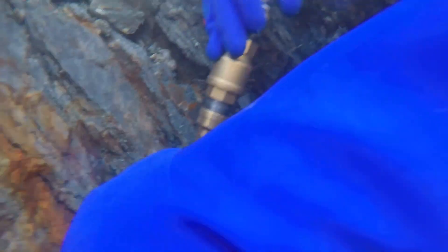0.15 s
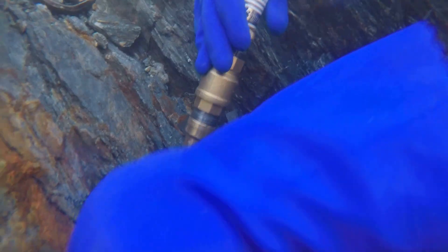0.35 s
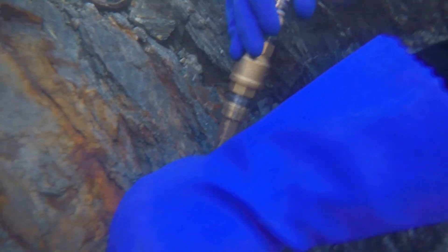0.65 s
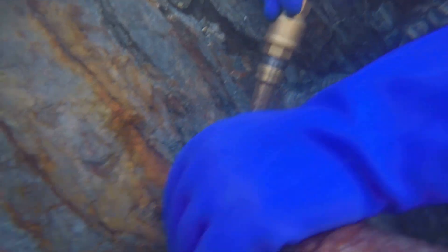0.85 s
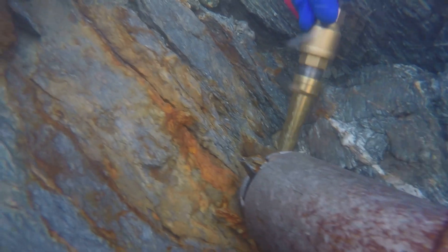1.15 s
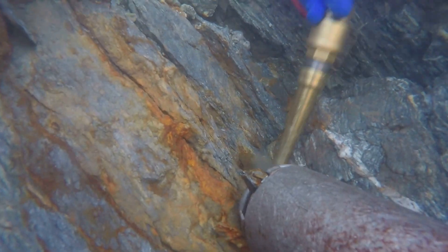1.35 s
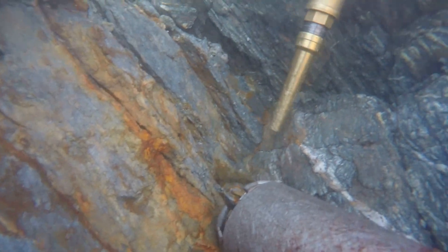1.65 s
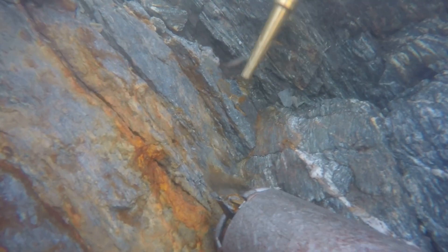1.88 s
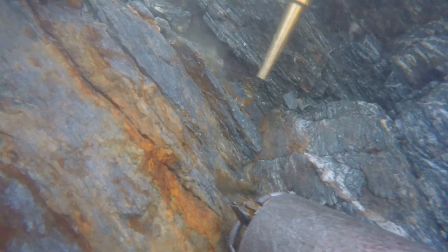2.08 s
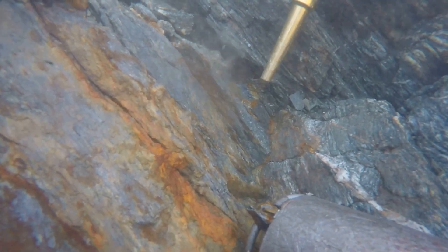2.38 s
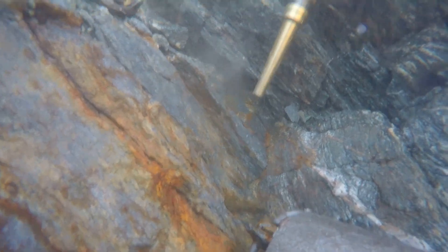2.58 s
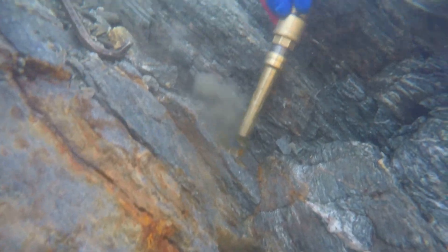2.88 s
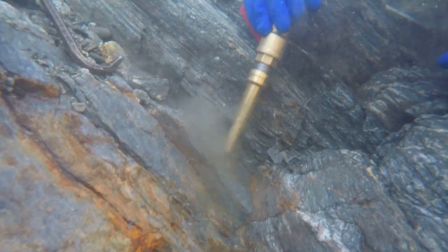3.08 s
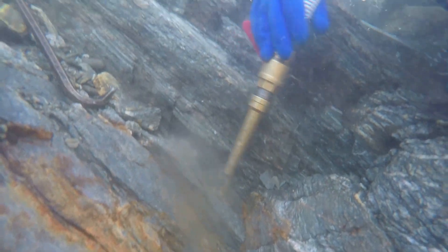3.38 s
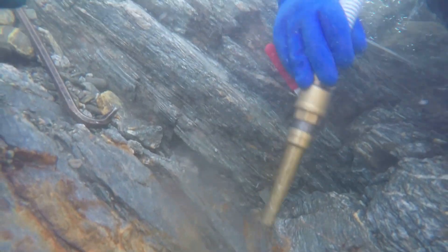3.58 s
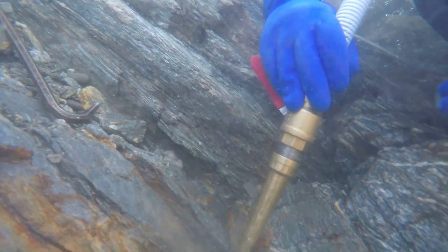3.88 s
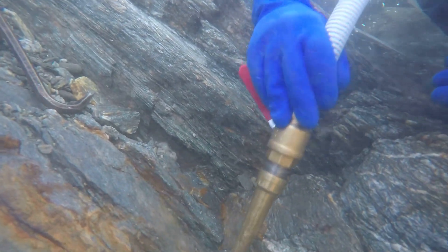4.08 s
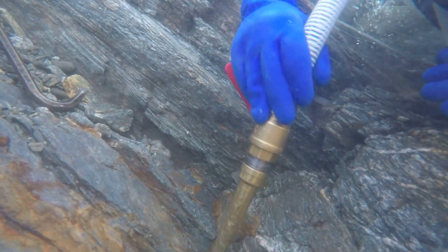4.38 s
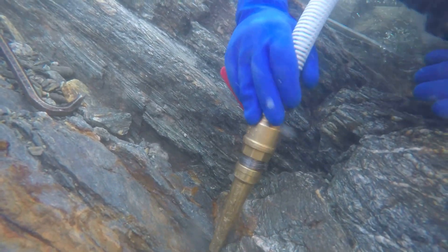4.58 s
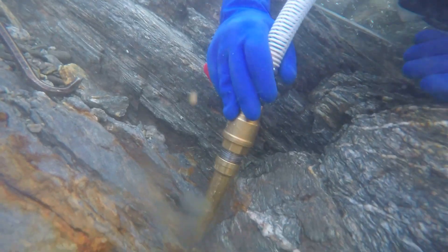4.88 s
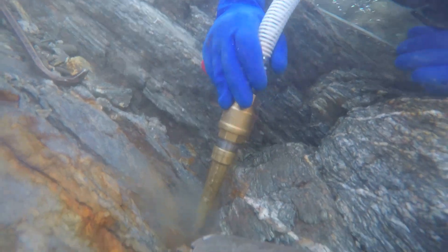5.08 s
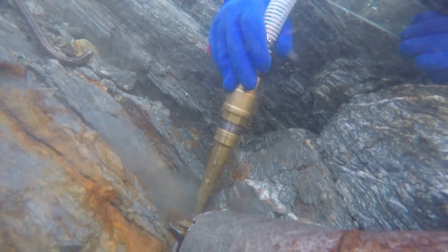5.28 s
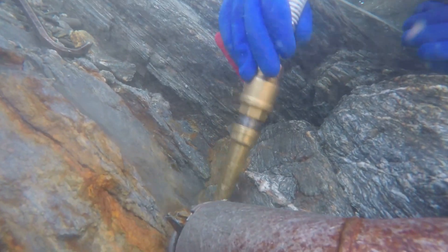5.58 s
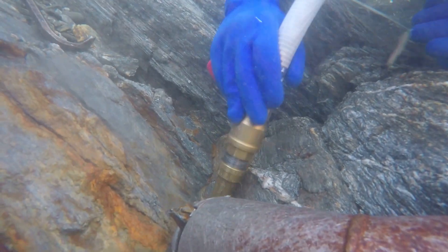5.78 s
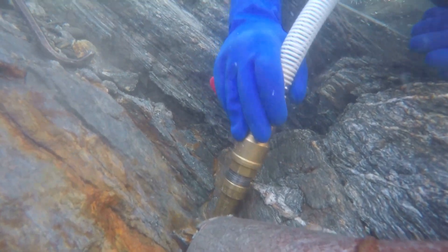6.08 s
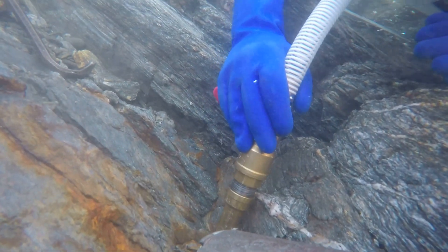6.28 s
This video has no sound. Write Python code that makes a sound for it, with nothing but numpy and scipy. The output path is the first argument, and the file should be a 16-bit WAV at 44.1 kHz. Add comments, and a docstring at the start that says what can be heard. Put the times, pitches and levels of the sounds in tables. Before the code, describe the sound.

Close, muffled underwater sound in a creek. A suction dredge rumbles deep while water hisses through the nozzle and fine grit ticks. It opens with bumps against the microphone housing, a loud stone crack and bubble blips; gravel rattles and scrapes until about two seconds, a sparser, watery middle follows, then bubbles, sharp knocks, and a final burst of stones hitting the pipe.

```python
"""Under water in a creek, 6.45 s: a suction dredge rumbles and water rushes throughout, with ticking grit.
Stones knock and scrape at once, surges thump, bubbles follow; a clatter at 0.6 s thins into scattered clicks.
Bubbles return, mostly from 4 to 5 s; stones strike near 4.4 and 5.6 s and hardest from 6.2 s.
Water and grit are noise through modes of the microphone's sealed housing, and clicks ring those modes;
knocks are thuds with pipe tones, surges damped swings, bubbles sliding sines."""
import sys
import numpy as np
from scipy import signal
from scipy.fft import rfft, irfft, next_fast_len
from scipy.io import wavfile

SR = 44100
rng = np.random.default_rng(int(sys.argv[2]) if len(sys.argv) > 2 else 0)


def unload_audio(sound):
    """Save the sound as a 16-bit wav file, at the path given as the first command line argument."""
    columns = np.transpose(np.atleast_2d(sound))
    # keep every value between -1 and 1, then stretch to whole-number steps
    steps = np.round(np.clip(columns, -1, 1) * 32767)
    wavfile.write(sys.argv[1], SR, steps.astype(np.int16))


N = 284445

# modes of the sealed housing, one list per register (low, middle, high, top): centre_hz, width_hz, gain_db
HOUSING_MODES = [
    [(506, 193, -2), (761, 104, 3), (993, 260, -8.5), (1496, 157, -3)],
    [(1970, 134, -5.5), (2306, 130, 3), (2900, 260, 7.5), (3154, 263, 4), (3466, 360, 0), (4030, 360, -5)],
    [(4520, 210, -5), (4770, 160, -5.5), (5306, 570, -2.5), (6010, 610, -2.5), (7074, 260, -4.5),
     (8060, 840, -10.5)],
    [(9580, 630, -21.5), (10620, 390, -12), (15060, 2400, -12)],
]
LOW, MIDDLE, HIGH, TOP = range(4)


def from_db(db):
    """Decibels to gain."""
    return 10 ** (np.asarray(db) / 20)


def rms_one(x):
    """Scale to rms 1."""
    return x / np.sqrt(np.mean(x ** 2) + 1e-20)


def in_time(rows):
    """Interpolate the columns of a curve table, sample by sample."""
    s, *columns = np.transpose(rows)
    return [np.interp(np.arange(N) / SR, s, c) for c in columns]


def drift(rate_hz):
    """Slow chance of rms 1: noise at SR / 40 through a double one-pole low-pass, run in."""
    r = np.exp(-80 * np.pi * rate_hz / SR)
    noise = rng.standard_normal(N // 40 + 2002)
    slow = signal.lfilter([1], [1, -2 * r, r * r], noise)[2000:]
    return np.interp(np.arange(N) / 40, np.arange(len(slow)), rms_one(slow))


def resonance(x, hz, width_hz):
    """Two-pole resonance with gain 1 on top."""
    r = np.exp(-np.pi * width_hz / SR)
    zeros = np.array([1, 0, -1]) * (1 - r * r) / 2
    poles = [1, -2 * r * np.cos(2 * np.pi * hz / SR), r * r]
    return signal.lfilter(zeros, poles, x)


def coloured(spectrum):
    """Noise of rms 1 with the given spectrum, interpolated over log frequency."""
    size = next_fast_len(N)
    hz = np.maximum(np.arange(size // 2 + 1) * SR / size, 1)
    points = np.array(spectrum)
    gain_db = np.interp(np.log(hz), np.log(points[:, 0]), points[:, 1], left=-90, right=-90)
    noise = rfft(rng.standard_normal(size))
    return rms_one(irfft(noise * from_db(gain_db), size)[:N])


def add(out, s, sound):
    """Mix a short sound in at time s."""
    at = round(s * SR)
    out[at:at + len(sound)] += sound[:N - at]


def register(x, index, uneven_db=0):
    """Parallel modes of one housing register, signs alternating; rows of blows may strike them unevenly."""
    modes = HOUSING_MODES[index]
    luck_db = np.zeros((1, len(modes)))
    if uneven_db:
        luck_db = uneven_db * rng.standard_normal((len(x), len(modes), 1))
    return sum((-1) ** k * from_db(db + luck_db[:, k]) * resonance(x, hz, width_hz)
               for k, (hz, width_hz, db) in enumerate(modes))


def grains(per_s, spread_db):
    """Random contacts of uneven size and either sign."""
    sizes = from_db(spread_db * np.minimum(rng.exponential(1, N), 4)) * rng.choice([-1, 1], N)
    return sizes * (rng.random(N) < per_s / SR) + 1e-18   # the offset keeps filters out of denormals


def fine_hiss(level_db):
    """A very faint hiss: noise in the top register, wavering slightly."""
    return from_db(level_db + 1.4 * drift(3.2)) * rms_one(register(rng.standard_normal(N), TOP))


def buffeting(level_db, surge_db):
    """Deepest low sound of the dredge: shaped noise that follows the gusts by half."""
    # spectrum of the buffeting: frequency_hz, relative_level_db
    spectrum = [(10, -21), (16, -11.5), (25, -3), (40, -4.5), (60, -9.5), (80, -10), (100, -21.5),
                (125, -13.5), (200, -32)]
    return from_db(level_db + 0.49 * surge_db + 0.87 * drift(7.0)) * coloured(spectrum)


def pump_rumble(level_db, surge_db):
    """Pump rumble: noise peaking near 170 Hz that follows the gusts."""
    # spectrum of the rumble: frequency_hz, relative_level_db
    spectrum = [(80, -38), (112, -15), (140, 0.5), (172, 1), (210, -4), (250, -6.5), (290, -14), (340, -25),
                (440, -28.5), (600, -40)]
    return from_db(level_db + surge_db + 0.42 * drift(12.5)) * coloured(spectrum)


def rush(level_db, index):
    """Turbulent water: wavering noise heard through one register of the housing."""
    waver = from_db(0.91 * drift(4.6) + 1.6 * drift(45.0))
    return from_db(level_db) * rms_one(register(waver * rng.standard_normal(N), index))


def jet(level_db):
    """The jet hisses in the middle register, sings in a narrow band and crackles with lifted sand."""
    hiss = rush(0, MIDDLE)
    singing = from_db(-2.5 + 2.9 * drift(3.9)) * resonance(hiss, 3100, 140)
    sand = grains(400 * from_db(1.8 * drift(9.9)), spread_db=14.0)
    crackle = rms_one(register(sand, MIDDLE))
    return from_db(level_db) * rms_one(hiss + singing + from_db(-14) * crackle)


def froth():
    """Rows of small bubbles at random times and pitches within each swarm."""
    # swarms of small bubbles: start_s, end_s, mean_peak_db
    swarms = [(0.093, 0.447, -48.5), (0.948, 1.707, -54.5), (4.298, 4.364, -43.5), (4.711, 4.839, -44),
              (4.841, 4.988, -42), (5.066, 5.117, -52.5)]
    per_s, low_hz, octaves, cycles = 150, 552, 1.99, 29
    rows = []
    for start, end, peak_db in swarms:
        count = round(per_s * (end - start))
        for when, size, luck, slide in rng.random((count, 4)):
            s = start + when * (end - start)
            hz = low_hz * 2 ** (octaves * size)
            rise_per_s = 3.3 * (2.6 * slide - 0.6)
            rows.append((s, peak_db + 12 * (luck - 0.5), hz, cycles / hz, rise_per_s))
    return rows


def bubbles():
    """A bubble rings on, then dies quickly: an unsteady sine whose pitch slides."""
    # bubbles pinched off near the nozzle: start_s, peak_db, start_hz, t60_s, rise_per_s (share of pitch)
    nozzle_bubbles = [(.245, -32.5, 1530, 0.022, 4), (.273, -23, 732, 0.065, 4.5),
                      (.25, -40, 796, 0.022, 4), (.25, -42, 1060, 0.022, 3), (.333, -41, 1234, .04, 15.5),
                      (.355, -38, 920, 0.045, 11), (.367, -45, 1520, .03, 0), (.379, -38, 870, 0.054, -4),
                      (.403, -45, 1510, 0.043, 2), (.44, -39, 745, 0.049, 6), (2.323, -21, 701, 0.068, 5),
                      (2.324, -27.5, 595, 0.043, -1), (3.915, -30.5, 2900, 0.015, -3),
                      (4.018, -44, 1080, 0.048, 9), (4.043, -33, 782, 0.054, 2),
                      (4.059, -41, 2900, 0.023, -4), (4.325, -33, 1300, 0.03, 1),
                      (4.733, -40, 1830, .025, 0), (4.743, -43, 2330, .03, -1),
                      (4.772, -27, 1125, 0.057, 3), (4.809, -34, 1080, 0.04, 1), (4.85, -35, 1104, .03, 2),
                      (4.852, -38, 630, 0.049, -2), (4.873, -32, 2310, 0.019, -5.),
                      (4.878, -31, 835, .03, 1), (4.925, -43, 4000, .02, -1), (4.94, -32, 1017, 0.046, 4),
                      (4.944, -29.5, 765, 0.089, 3), (5, -28, 3850, 0.0078, 2.5),
                      (5.037, -42, 1630, .025, 2)]
    out, t = np.zeros(N), np.arange(8192) / SR
    wobble = from_db(0.77 * drift(77.0))
    for s, peak_db, hz, t60_s, rise_per_s in [*nozzle_bubbles, *froth()]:
        shape = (1 - np.exp(-t / 0.0016)) * from_db(-60 * (t / t60_s) ** 1.56)
        tone = np.sin(2 * np.pi * hz * (t + rise_per_s * t * t / 2))
        add(out, s, from_db(peak_db) * shape / shape.max() * tone)
    return wobble * out


def thumps():
    """A surge pushes the housing, which swings back and settles: a damped sine."""
    # surges against the housing: start_s, peak_db, swing_hz, t60_s, direction (+1 or -1)
    surges = [(0.099, -9, 21, 0.22, 1), (0.146, -5, 44, 0.086, 1), (0.164, -2.5, 65, 0.053, 1),
              (0.194, -8.5, 21.2, 0.3, 1), (0.435, -10, 65.5, 0.087, -1), (0.64, -5, 56, 0.083, -1),
              (0.811, -5.5, 55, 0.038, -1), (1.091, -12, 31, 0.048, 1), (2.957, -16, 42, 0.32, 1),
              (4.413, -15, 46.5, 0.15, -1), (5.859, -10.5, 62, 0.035, 1)]
    out, t = np.zeros(N), np.arange(16384) / SR
    for s, peak_db, hz, t60_s, direction in surges:
        swing = (1 - np.exp(-t / 0.00076)) * from_db(-60 * t / t60_s) * np.sin(2 * np.pi * hz * t)
        add(out, s, direction * from_db(peak_db) * swing / np.abs(swing).max())
    return out


def grit(level_db):
    """Sand hisses and ticks in clumps; each grain rings briefly at one of twelve pitches."""
    contacts = grains(800 * from_db(7.3 * drift(25.0)), spread_db=4.5)
    dealt = rng.integers(0, 12, N)
    ticks = np.zeros(N)
    for k, hz in enumerate(np.geomspace(3500, 14000, 12)):
        once = resonance(contacts * (dealt == k) + 1e-18, hz, 0.11 * hz)
        ticks += resonance(once, hz, 0.11 * hz)
    ticks = rms_one(ticks)
    high = ticks + from_db(2.5 + 2.0 * drift(50.0) + 2.5 * drift(13.0)) * rng.standard_normal(N)
    top = ticks + from_db(0.5 + 1.9 * drift(40.0) + 2.3 * drift(11.0)) * rng.standard_normal(N)
    return from_db(level_db) * rms_one(register(high, HIGH) + from_db(2.5) * register(top, TOP))


def housing_body(x):
    """The housing shaking as a whole: two low resonances in series."""
    return resonance(resonance(x, 165, 126), 270, 165)


def scrapes():
    """Dense uneven contacts under each stroke shake the housing and ring three of its registers."""
    # gravel, glove and nozzle along rock: start_s, end_s, body_rms_db, low_rms_db, middle_rms_db, high_rms_db
    strokes = [(0.095, 0.161, -17.5, -43, -47, -51), (0.145, 0.231, -21, -36.5, -41, -49),
               (0.34, 0.474, -37, -63, -63, -73), (0.63, 0.645, -27, -24, -40, -55),
               (0.636, 0.677, -24, -28.5, -29, -47), (0.664, 0.709, -31.5, -33, -33, -68),
               (0.803, 0.834, -18.5, -29, -29, -34), (1.034, 1.7, -52, -63, -52, -68),
               (1.06, 1.142, -54, -52, -50, -63), (1.252, 1.335, -56, -65, -50, -71),
               (1.117, 1.235, -37.5, -41.5, -41, -50.5), (1.345, 1.406, -37, -34.5, -36, -48),
               (1.512, 1.535, -37, -50, -35, -45), (1.592, 1.679, -45, -56, -62, -58),
               (1.763, 1.818, -70, -67, -32.5, -45.5), (1.824, 1.862, -50, -34.5, -27, -40),
               (4.717, 4.844, -57, -54, -44.5, -60), (4.765, 4.809, -60, -52, -51, -42),
               (4.83, 4.95, -44, -42, -52, -72), (4.941, 4.98, -46, -48, -60, -57),
               (5.083, 5.11, -30, -35, -46, -61), (6.17, 6.229, -51, -33, -41, -47),
               (6.286, 6.33, -53, -42, -44, -44)]
    t, out = np.arange(N) / SR, np.zeros(N)
    for k in range(4):
        envelope = np.zeros(N)
        for start, end, *levels_db in strokes:
            fade = np.minimum((t - start) / 0.0026, (end - t) / 0.053)
            envelope += from_db(levels_db[k]) * np.clip(fade, 0, 1)
        contacts = grains(2500 * from_db(5.9 * drift(65.0)), spread_db=-8.5)
        body = housing_body if k == 0 else lambda x: register(x, k - 1)
        out += body(envelope * contacts) / np.std(body(contacts))
    return out


def knocks():
    """A blunt blow of a larger stone: a broad dull thud, and the pipe ringing on in one of its modes."""
    # blows on the pipe: start_s, thud_peak_db, ring_level_db, pipe_mode (index)
    blows = [(0.099, -33, -30, 0), (.13, -34, -36, 0), (.149, -33, -27, 2), (.159, -32, -22, 2),
             (.174, -9.5, -20, 1), (0.1772, -16.5, -25, 2), (.247, -42, -28, 2), (0.256, -26, -40, 2),
             (.265, -24.5, -28, 2), (0.626, -22, -17.5, 1), (0.631, -21, -19, 1), (0.639, -25, -42, 1),
             (0.666, -28, -15.5, 2), (0.674, -43, -49, 3), (.68, -34, -22, 2), (.687, -36, -25.5, 2),
             (.809, -33, -26.5, 2), (0.969, -32, -32, 1), (1.031, -43, -28, 2), (1.34, -19, -48, 3),
             (1.978, -26, -34, 1), (2.133, -21.5, -40, 3), (2.325, -44, -38, 1), (2.766, -22.5, -28, 2),
             (3.334, -33, -34, 0), (4.646, -20.5, -28, 2), (4.847, -16.5, -41, 1), (4.902, -25, -45, 0),
             (5.083, -24, -23.5, 2), (5.1, -24.5, -44, 1), (5.753, -15.5, -26, 2), (5.85, -27, -36, 2),
             (5.855, -23.5, -48, 2), (6.179, -13, -26, 3), (6.18, -28, -21, 4), (6.185, -34, -30, 4),
             (6.268, -29, -30.5, 3), (6.307, -15, -47, 3), (6.315, -21, -32, 3), (6.37, -24, -28, 3),
             (6.373, -43, -27.5, 4)]
    # modes of the pipe: ring_hz, t60_s
    pipe_modes = [(425, 0.047), (530, 0.07), (780, 0.042), (1490, 0.13), (2950, 0.056)]
    # upper edge of the thud for each pipe mode, brighter for higher modes: thud_top_hz
    thud_top_hz = [604, 610, 800, 1310, 1600]
    out, t = np.zeros(N), np.arange(8192) / SR
    for s, thud_db, ring_db, mode in blows:
        hz, t60_s = pipe_modes[mode]
        band = signal.butter(2, [180, thud_top_hz[mode]], "band", fs=SR, output="sos")
        push = rng.standard_normal(len(t)) + 1.05 * (t == 0)   # one push, then a rumble
        thud = signal.sosfilt(band, push * from_db(-60 * t / 0.015))
        tone = np.sin(2 * np.pi * hz * t) + 0.08 * np.sin(2 * np.pi * 1.2 * hz * t)
        ring = tone * from_db(-60 * t / t60_s)
        add(out, s, from_db(thud_db) * thud / np.abs(thud).max() + from_db(ring_db) * ring)
    return out


def pebbles(grit_db):
    """Rows of small clicks at random times, rising and falling with the grit."""
    # small clicks in the five bands, low to top: mean_peak_db
    mean_peak_db = [-50, -41, -42, -40, -50]
    count, spread_db = 36, 5
    at = rng.random(count) * (N - 1)
    peaks_db = mean_peak_db + spread_db * rng.standard_normal((count, 5))
    peaks_db += grit_db[at.astype(int), None] - grit_db.mean()
    return np.column_stack([at / SR, peaks_db])


def clicks(grit_db):
    """Stone contacts: a crack, sharp if strong, rings the housing with its own level in each band."""
    # louder stone clicks: start_s, then peaks low to top: band1_db, band2_db, band3_db, band4_db, band5_db
    stone_rows = [(0.0088, -57, -33, -32.5, -33, -55.0), (0.0265, -58.0, -48.0, -51, -38, -64),
                  (0.0328, -61, -51.0, -36, -56.0, -66.0), (0.041, -57.0, -50.0, -54.0, -41, -47),
                  (0.0945, -35, -50.0, -30, -36, -35), (0.1291, -49.0, -49, -53.0, -36, -24),
                  (0.1539, -42, -34, -42, -44, -53), (0.1735, -32, -4, -9, -16.5, -21),
                  (0.1765, -39, -6, -19, -21, -32), (0.181, -30, -26, -32, -18.5, -26),
                  (0.1922, -39, -38, -40, -45, -44), (0.2593, -52.0, -33, -52.0, -37, -33),
                  (0.2662, -30, -27, -33.0, -23, -19.5), (0.2893, -54, -37, -21.5, -48, -66.0),
                  (0.341, -48, -36, -45, -52, -62), (0.3496, -27.5, -43, -23, -22, -42),
                  (0.4379, -61, -30, -33, -51, -68.0), (0.4465, -60.0, -37, -37, -57.0, -61.0),
                  (0.4683, -64, -58, -53, -34, -58), (0.501, -60, -51, -38, -41, -61),
                  (0.54, -60, -36, -52, -56, -58), (0.624, -34, -27, -28, -39, -48),
                  (0.629, -32, -38, -32, -29, -34), (0.6397, -38, -18, -14, -19, -43),
                  (0.643, -36, -17, -30, -36, -50), (0.6585, -44, -37, -32, -44, -60),
                  (0.6651, -38, -13.5, -17, -46, -64), (0.668, -40, -18, -24, -46, -64),
                  (0.674, -43, -25, -25, -50, -64), (0.679, -38, -36, -32, -50, -64),
                  (0.685, -42, -30, -28, -50, -64), (0.7076, -40, -32, -28.0, -24.5, -40),
                  (0.7406, -38, -39, -45, -31, -49), (0.8141, -40, -33, -29, -31, -33),
                  (0.8427, -57, -31.5, -43, -45, -64.0), (0.8828, -57, -49, -39, -27, -47),
                  (0.8905, -52, -29, -43, -44.0, -57.0), (0.9111, -58, -49, -35, -36, -51.0),
                  (0.9448, -55.0, -46, -47, -29.5, -49), (0.9644, -54.0, -31, -42, -35, -47.0),
                  (0.9761, -47, -43, -40.0, -33, -38), (1.0313, -26, -30, -40, -31, -52),
                  (1.0669, -41, -33, -43, -35, -48), (1.0873, -49, -42, -53, -39, -49),
                  (1.1045, -50, -45, -53, -29, -49), (1.132, -44, -44, -58, -33, -48),
                  (1.1487, -43, -27, -52.0, -39, -59.0), (1.1745, -37, -28, -22.5, -29, -36),
                  (1.1979, -49, -44, -53, -32, -50), (1.2249, -45, -47, -43, -52, -59),
                  (1.2735, -49.0, -35, -45, -33, -43), (1.297, -49, -27.5, -35, -28.5, -52),
                  (1.311, -47, -33, -47, -45, -46), (1.3383, -19.5, -22, -32, -31, -44),
                  (1.3524, -43, -33, -36, -40, -48.0), (1.36, -38, -33, -24, -27, -43),
                  (1.3683, -50, -34, -23, -28.5, -49), (1.3766, -46, -45, -45, -25, -46),
                  (1.3872, -38, -31, -33, -38, -41), (1.4343, -46, -27, -41, -27, -52),
                  (1.4484, -34, -23.5, -30, -44, -40.0), (1.4647, -41, -22.5, -33, -31, -50),
                  (1.481, -49, -44, -48, -39, -59), (1.4957, -50, -32, -45, -27.5, -53),
                  (1.5105, -47, -44, -52, -35, -59), (1.5194, -32, -30, -26, -39, -45),
                  (1.5248, -48.0, -25, -33, -34, -54.0), (1.5308, -45, -27, -33.0, -31.0, -42.0),
                  (1.5961, -52, -35, -37, -38, -51), (1.6053, -48, -49, -46, -31, -52),
                  (1.6119, -50, -43, -50, -41, -47), (1.6247, -51.0, -47.0, -47, -34, -52.0),
                  (1.6332, -52, -35, -40, -38, -46), (1.6455, -52, -47, -53, -33, -41),
                  (1.6659, -51, -38, -42, -43, -48), (1.6776, -57, -41, -39.0, -39, -60.0),
                  (1.7698, -34.0, -19.5, -29, -40, -42), (1.7878, -34, -36, -20, -31, -41.0),
                  (1.8, -52, -43, -45, -34, -44), (1.8159, -52, -52, -49, -37, -55),
                  (1.8257, -46, -42, -33, -33, -51.0), (1.8372, -49, -17, -23.5, -34, -44),
                  (1.8554, -51, -52, -41, -46, -62), (1.8825, -47, -48, -52, -42, -52),
                  (1.9153, -53, -49.0, -53.0, -36.5, -54), (1.9443, -51.0, -46, -39, -56, -45),
                  (1.9644, -53, -34, -41.0, -59.0, -65.0), (1.9901, -38, -50, -36, -36, -46),
                  (2.0471, -33, -46, -26, -46, -61.0), (2.0847, -48, -39, -51, -48, -41),
                  (2.1594, -39, -43, -41.0, -43, -52), (2.1721, -51.0, -51, -33, -50, -46),
                  (2.2624, -52.0, -48, -42.0, -35, -46), (2.2886, -36.0, -52, -44, -30, -53),
                  (2.3866, -33, -39, -32, -37, -52), (2.4085, -50.0, -49.0, -40, -37, -73),
                  (2.5358, -46, -44, -52, -37, -65.0), (2.636, -51, -41, -54.0, -42, -44),
                  (2.6732, -31.5, -39, -53.0, -34, -41), (2.7656, -47, -32, -42, -50, -66.0),
                  (2.7752, -46, -49.0, -54.0, -46, -58), (2.8507, -51.0, -49.0, -56, -27.0, -46),
                  (2.9733, -50.0, -33, -43, -38, -42), (3.0219, -45, -48.0, -52, -34, -60),
                  (3.093, -44, -44, -54.0, -39, -44), (3.1086, -36, -48, -48, -35.5, -55.0),
                  (3.1286, -46, -30, -39, -40, -41), (3.1955, -48, -49.0, -57, -32, -44),
                  (3.228, -47, -33, -43, -58, -59), (3.3007, -55.0, -29, -51, -39, -44),
                  (3.3063, -55.0, -31, -45, -22, -38), (3.3216, -54, -41, -46.0, -43, -45),
                  (3.4173, -55.0, -59, -58.0, -36.5, -54), (3.5063, -33.5, -32, -30, -34, -40),
                  (3.6173, -56, -40, -74, -37, -47), (3.7993, -57, -55, -45, -34, -71.0),
                  (3.8584, -53, -52, -47, -34.5, -51.0), (3.9153, -56.0, -45, -39, -53, -59),
                  (3.9317, -55.0, -41, -38, -51, -56.0), (3.94, -55.0, -48, -56.0, -37, -59),
                  (3.9981, -54.0, -35, -36, -44, -56), (4.0249, -44, -39, -40, -38, -56.0),
                  (4.0419, -55, -39, -56.0, -29.5, -56), (4.1053, -39, -54.0, -57.0, -35.5, -66),
                  (4.2232, -42, -43, -57.0, -45, -59), (4.251, -53.0, -28, -36, -45.0, -54.0),
                  (4.2732, -57, -55, -58, -36, -47), (4.3502, -29, -40, -21.5, -25, -48),
                  (4.3854, -33, -55, -32, -33.5, -70), (4.425, -32, -20.5, -25, -15.5, -10),
                  (4.4342, -55, -55.0, -55.0, -43.0, -31), (4.487, -54.0, -48, -55.0, -39, -37),
                  (4.4957, -54.0, -54, -45, -38, -39), (4.5146, -55.0, -52, -58, -48, -50),
                  (4.5236, -39, -44, -34, -24, -53), (4.591, -51, -35, -28, -36, -47),
                  (4.628, -55.0, -52.0, -47, -50, -44), (4.6458, -26, -28, -33, -49, -60.0),
                  (4.6785, -51, -49, -40, -41, -52), (4.7097, -52, -34, -53, -49, -59),
                  (4.716, -51, -37, -53, -52, -59), (4.7334, -43, -43, -50, -50, -60),
                  (4.748, -48, -34, -41, -43, -54), (4.7638, -45, -31, -29, -39, -51),
                  (4.7722, -30, -40, -27.5, -25, -48), (4.7782, -37, -46.0, -38.0, -29, -53),
                  (4.7886, -42, -43, -31, -28, -49), (4.794, -48, -44, -31, -40, -52),
                  (4.799, -50, -47, -54, -39, -54), (4.8054, -50, -48, -33, -57, -65),
                  (4.8469, -41, -27, -25, -54, -56.0), (4.8732, -31, -33, -58, -38, -55.0),
                  (4.9012, -29, -23, -33, -54, -41), (4.9593, -47, -57, -54.0, -29, -46),
                  (5.0008, -48, -39, -36, -37, -43), (5.009, -44, -43, -41, -46, -55),
                  (5.0837, -48, -42, -34, -56, -47), (5.1002, -53.0, -48, -47, -53, -60),
                  (5.1115, -57, -53, -39, -61.0, -65), (5.229, -59, -37, -52, -27, -36),
                  (5.2488, -47, -51.0, -55.0, -42, -53), (5.277, -53.0, -32, -47, -31, -50),
                  (5.3276, -52.0, -36, -37.5, -37, -46), (5.3424, -57, -51.0, -54.0, -41, -56),
                  (5.3862, -52.0, -31, -53, -46, -51.0), (5.3914, -42, -31, -38, -34, -51.0),
                  (5.4012, -54, -37, -38, -43, -46.0), (5.4381, -54, -50, -51, -57, -65.0),
                  (5.5307, -52.0, -52.0, -56.0, -43, -49), (5.5777, -42, -9.5, -18, -27.0, -37),
                  (5.593, -53, -21, -37, -21.5, -42), (5.6308, -51.0, -37, -40.0, -32.0, -55),
                  (5.692, -50.0, -30, -36, -32, -40), (5.7522, -20, -20.5, -39, -35, -52.0),
                  (5.7922, -51.0, -47, -42, -38, -50), (5.8535, -49, -19, -49, -46, -53),
                  (5.9228, -42, -36, -43, -43, -43), (5.935, -46.0, -36.0, -34.5, -36, -46),
                  (5.945, -31.5, -45, -31, -46, -47), (6.0255, -41, -42, -48, -34, -50),
                  (6.0648, -46, -47, -57.0, -42, -48), (6.1054, -52.0, -36, -41, -29, -51),
                  (6.1786, -41, -1, -9, -9.5, -23), (6.1852, -31, -9.5, -15, -8.5, -40),
                  (6.2011, -38, -28, -34, -40, -50), (6.2592, -43.0, -43, -51.0, -26, -59.0),
                  (6.2695, -23.5, -15, -8, -9.5, -25), (6.2924, -28, -24, -21, -33, -33),
                  (6.3069, -21.5, -17, -23, -18, -31.0), (6.3095, -22, -33, -34, -28, -33),
                  (6.3154, -26, -24, -29, -22, -32.0), (6.3363, -42.0, -35, -35, -37, -44),
                  (6.3455, -52, -43, -51, -48, -45), (6.357, -52, -45, -47, -51, -44),
                  (6.3706, -18.5, -13.5, -37, -12, -24), (6.4074, -49.0, -50.0, -47, -56.0, -51.0),
                  (6.4258, -52.0, -36, -51.0, -37, -36), (6.4359, -53, -44.0, -42, -47, -41)]
    # edges of the five bands: edge_hz
    edges_hz = [1050, 1800, 3250, 4300, 8800, 13000]
    # how unevenly a click strikes the modes of each register: spread_db
    mode_spread_db = [1.6, 3.86, 5.6, 3.6]
    t60_s, tail_db, tail_t60_s = 0.016, -21, 0.11   # decay, and a faint rattling tail
    soft_db, hard_db, soft_rise_s = -38.5, -23, 0.0005   # weak contacts swell in, strong ones tick
    out, t = np.zeros(N), np.arange(3072) / SR
    rows = np.vstack([stone_rows, pebbles(grit_db)])
    start_s, peaks_db = rows[:, 0], rows[:, 1:]

    decay = from_db(-60 * t / t60_s) + from_db(tail_db - 60 * t / tail_t60_s)
    cracks = rng.standard_normal((len(rows), len(t))) * decay
    hard = np.clip((peaks_db.max(axis=1, keepdims=True) - soft_db) / (hard_db - soft_db), 0, 1)
    cracks *= 1 - (1 - hard) * np.exp(-t / soft_rise_s)
    cracks[:, :1] += 4.05 * hard * np.sign(cracks[:, :1])
    cracks *= 1 + 2.77 * hard * np.exp(-t / 0.000053)   # the first instant of contact is the hardest

    rung = sum(register(cracks, k, mode_spread_db[k]) for k in range(len(HOUSING_MODES)))
    sounds = np.zeros_like(rung)
    for k, edges in enumerate(zip(edges_hz, edges_hz[1:])):
        band = signal.butter(3, edges, "band", fs=SR, output="sos")
        ring = signal.sosfilt(band, rung)
        ring /= np.abs(ring).max(axis=1, keepdims=True)
        sounds += (-1) ** k * from_db(peaks_db[:, [k]]) * ring
    for s, sound in zip(start_s, sounds):
        add(out, s, sound)
    return out


def dead_spot(x):
    """A dead spot of the housing: part of one narrow band is taken out."""
    return x - 0.45 * resonance(x, 2520, 260)


def scene():
    """Low rumble, rushing water, surges and bubbles, then grit and stones, with the housing's dead spot."""
    # low sound of the dredge: time_s, buffeting_db, rumble_db
    buffeting_db, rumble_db = in_time([(0.0, -21, -17.5), (0.05, -20.5, -31.5), (0.16, -12.5, -23),
                                       (0.32, -29.5, -32), (0.55, -22, -24.5), (0.66, -17.5, -24),
                                       (0.74, -23.5, -32.5), (0.83, -18.5, -35.5), (0.9, -25.5, -28.5),
                                       (1.09, -26, -24.5), (1.26, -29.5, -31.5), (1.42, -25.5, -26),
                                       (1.54, -28.5, -32.5), (1.65, -25, -25.5), (1.85, -29, -28),
                                       (2.05, -22.5, -25.5), (2.25, -28, -27), (2.48, -23.5, -23),
                                       (2.65, -24.5, -26.5), (2.84, -27, -29.5), (3.1, -25, -27.5),
                                       (3.35, -30, -30), (3.55, -28.5, -33), (3.72, -29.5, -34.5),
                                       (3.9, -32, -33.5), (3.97, -29, -24), (4.18, -29.5, -29.5),
                                       (4.32, -32.5, -30), (4.55, -26, -32.5), (4.8, -28, -29.5),
                                       (5.0, -25, -28.5), (5.2, -26.5, -32.5), (5.4, -30.5, -29.5),
                                       (5.58, -24, -26.5), (5.7, -24, -29.5), (5.84, -29, -28),
                                       (6.02, -26, -26), (6.2, -31.5, -27.5), (6.45, -28, -31.5)])
    # water at the nozzle: time_s, deep_rush_db, jet_db, grit_db
    deep_db, jet_db, grit_db = in_time([(0.0, -49.5, -51.5, -57), (0.25, -56, -48.5, -52.5),
                                        (0.52, -53, -52.5, -54.5), (0.86, -49, -50, -54),
                                        (1.08, -45.5, -47, -52.5), (1.33, -43, -48.5, -52.5),
                                        (1.6, -46, -49.5, -52), (1.89, -46, -47, -57),
                                        (2.25, -44.5, -46, -56), (2.64, -43.5, -44.5, -56.5),
                                        (3.03, -44.5, -45.5, -56), (3.27, -48, -47, -58.5),
                                        (3.65, -49, -53, -58), (4.0, -47, -51, -58),
                                        (4.42, -47.5, -51, -56), (4.87, -47, -48.5, -55.5),
                                        (5.06, -48, -49, -58.5), (5.41, -47, -50.5, -56.5),
                                        (5.8, -44, -48.5, -56.5), (6.16, -46.5, -47, -57),
                                        (6.45, -46.5, -54, -56.5)])
    surge_db = drift(9.8)   # gusts of flow shared by the low layers
    low = buffeting(buffeting_db, surge_db) + pump_rumble(rumble_db, surge_db)
    flow = rush(deep_db + 0.87 * surge_db, LOW) + jet(jet_db) + fine_hiss(-92.0)
    water = low + flow + bubbles() + thumps()
    stones = grit(grit_db) + scrapes() + knocks() + clicks(grit_db)
    return dead_spot(water + stones)[None]


def record(dry):
    """Round the peaks, then cut the top with two low-passes."""
    rounded = 1.2 * np.tanh(dry / 1.2)
    softened = signal.sosfilt(signal.butter(8, 15300, fs=SR, output="sos"), rounded)
    return signal.sosfilt(signal.cheby2(10, 50, 16400, fs=SR, output="sos"), softened)


dry = scene()
out = record(dry)
unload_audio(out)
```